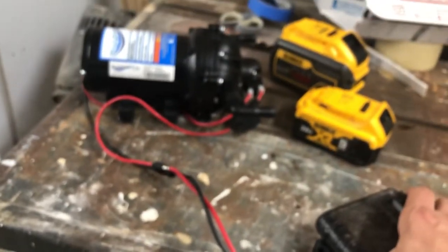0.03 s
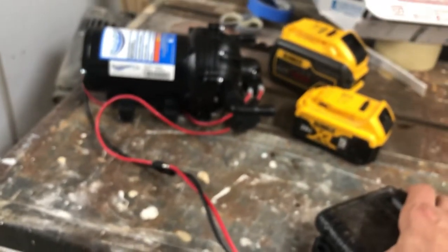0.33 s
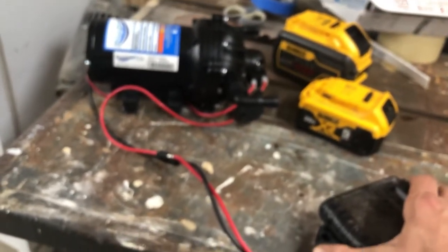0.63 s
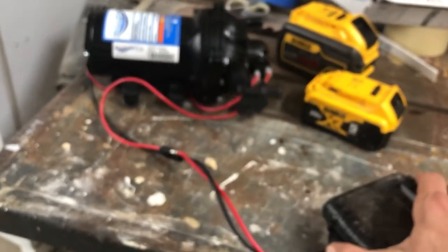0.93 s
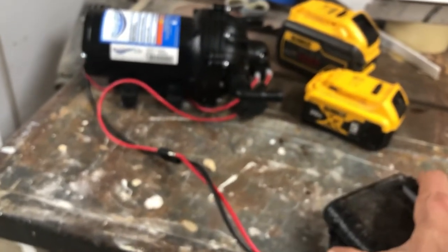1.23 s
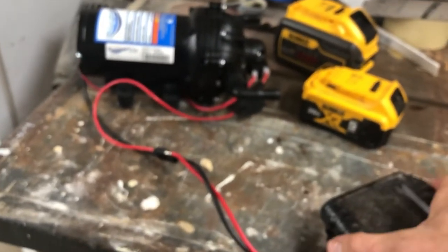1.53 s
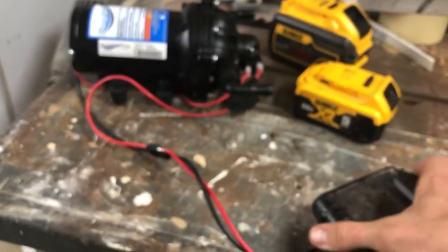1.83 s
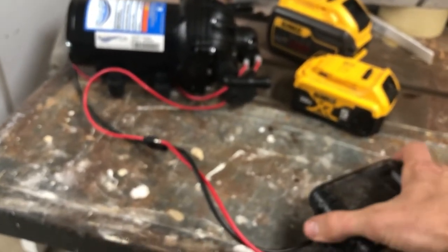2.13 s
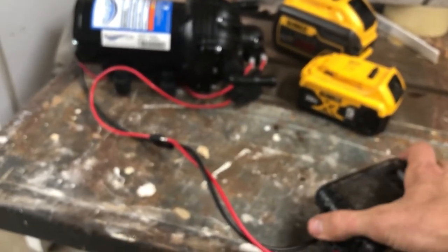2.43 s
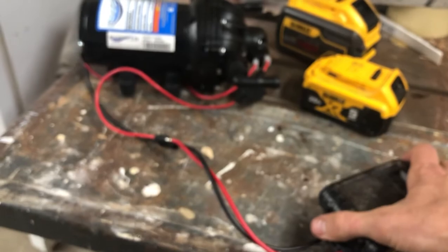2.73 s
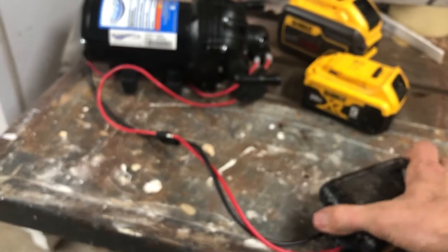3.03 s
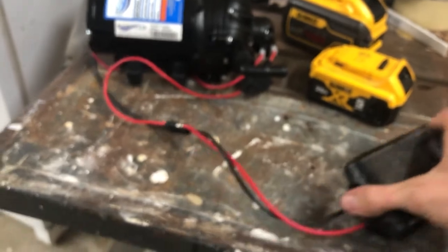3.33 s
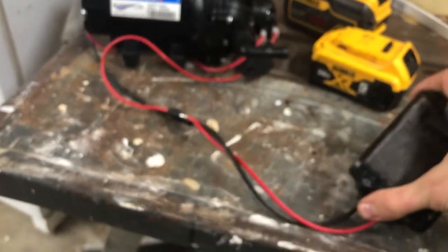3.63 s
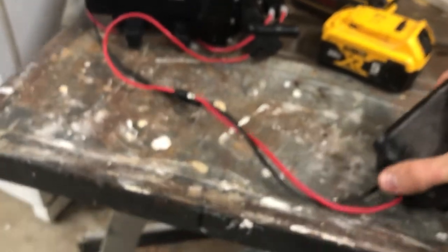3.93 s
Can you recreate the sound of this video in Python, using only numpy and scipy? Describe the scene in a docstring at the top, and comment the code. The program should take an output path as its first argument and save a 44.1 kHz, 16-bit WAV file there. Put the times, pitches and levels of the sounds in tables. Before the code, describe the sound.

An electric pump starts and runs close by on a workbench in a small workshop. After near silence, a short spark crackles at about 0.75 seconds and the motor kicks in with a loud, grinding jolt. From about 1 second to the end at 4 seconds, it runs steadily with a fast rattling buzz, a hum and a thin whine. Faint dull bumps on the bench come around 3.5 seconds.

```python
"""A small workshop, one microphone close to a wooden bench where an electric diaphragm pump runs dry.
The contact sparks at switch-on, the motor jolts and grinds up to speed under its inrush current, then
settles: every turn of the shaft knocks the pump head, slaps the valves and drags the brushes over the
commutator, above the hum of the body. The pump's feet shake the bench and now and then bump on it.
Behind it are a short room tail and faint room tone."""
import sys
import numpy as np
from scipy import signal
from scipy.fft import rfft, irfft, next_fast_len
from scipy.io import wavfile
from scipy.ndimage import map_coordinates

SR = 44100
rng = np.random.default_rng(int(sys.argv[2]) if len(sys.argv) > 2 else 0)


def to_wav(s):
    """Save 16-bit WAV."""
    ch = np.atleast_2d(s).T  # columns
    pcm = np.round(np.clip(ch, -1, 1) * 32767)  # PCM
    wavfile.write(sys.argv[1], SR, pcm.astype(np.int16))


N = 176400
T = np.arange(N) / SR
START_S, SPIN_UP_S = .785, .055  # the shaft starts to turn; time constant of its run-up
BALLS_PER_TURN = 2.075  # bearing balls that pass the loaded side

# shaft speed once run up (time [s], speed [turns/s])
SHAFT_SPEED = [(1.0, 57.1), (1.5, 57.42), (2.0, 57.6), (2.5, 57.78), (2.9, 57.87), (3.3, 57.85),
               (3.6, 57.7), (4.0, 57.72)]
# how loosely the pump rattles on its feet (time [s], gain [dB])
LOOSENESS = [(1.0, 3.5), (1.3, 1), (1.8, 1.3), (2.3, 0), (2.9, -1), (3.15, 1.3), (3.5, 1), (4.0, 2)]
# head knocks and valve slaps within one turn (position [turns], relative level [dB])
HEAD_KNOCKS = [(0.013, -3), (0.151, 2), (.6, -7)]
VALVE_SLAPS = [(.07, -1.5), (.32, -1.5), (.79, 1.5)]
# sharp ticks of the pump head (time [s], level [dB], pitch [Hz])
HEAD_TICKS = [(0.9149, -13, 3830), (1.1787, -26, 3740), (1.254, -16, 1270), (1.4595, -27, 5050),
              (1.806, -34, 5550), (3.841, -27.5, 3350)]
# steady partials of the body's hum (multiple of shaft speed, level [dB])
BODY_HUM = [(2, -38.5), (5, -35), (7, -48), (8, -43), (9, -49), (11, -40.5), (12, -43.5), (13, -46),
            (19, -46)]
# drifting hum at 1, 3, 4 and 6 times shaft speed (time [s], then four levels [dB])
LOW_HUM = [(1.0, -44, -43, -45, -44), (1.4, -45, -38.5, -44.5, -42), (1.65, -47, -36, -41.5, -39),
           (2.3, -46, -33.5, -38, -42.5), (2.95, -49, -33.5, -39.5, -42.5), (3.1, -45, -38.5, -41, -44.5),
           (3.3, -42, -46, -37, -47), (4.0, -44, -46, -40.5, -42.5)]
# commutator whine (time [s], level [dB])
WHINE = [(1.0, -43), (1.5, -42.5), (3.45, -43), (3.55, -45.5)]
# resonances of the motor can (frequency [Hz], width [Hz], relative level [dB])
CAN_MODES = [(3573, 150, 4.5), (4090, 81, 4), (5085, 78, 4.5), (5474, 51, 8), (6240, 110, 0.5),
             (7350, 64, 3.5), (7930, 125, 0), (11700, 270, -4.5), (12220, 150, -1.5), (14400, 390, -11)]
# resonances of the casing (frequency [Hz], relative level [dB], t60 [s])
CASING_MODES = [(193, 4.5, 0.15), (563.6, -5, 0.65), (650, 2.5, 0.14), (718, -3.5, 0.43), (795, -5, 0.22),
                (908, -4, 0.45)]
# contact sparks (time [s], relative level [dB], t60 [s])
SPARKS = [(0.684, -50, .04), (0.747, -39, 0.021), (0.752, -26.5, 0.018), (0.7627, -28, 0.016),
          (0.7673, -10, 0.013), (0.77, 3.5, 0.018), (0.7758, -4, 0.0099)]
# feet bumping the bench top (time [s], level [dB], half-length [s], pitch [Hz])
BENCH_BUMPS = [(0.807, -27, 0.018, 155), (0.938, -24.5, 0.02, 220), (0.99, -43, 0.07, 80.5),
               (1.037, -31.5, 0.041, 149), (3.463, -34.5, 0.045, 194), (3.6, -38, 0.023, 180),
               (3.856, -31.5, 0.022, 210)]
# tone colour of each source at the microphone (frequency [Hz], relative level [dB])
HEAD_SPECTRUM = [(40, -73), (170, -23), (400, -20.5), (530, -18), (640, -10.5), (760, 6.5), (920, 0),
                 (1050, -10), (1500, -12.5), (3000, -53)]
VALVE_SPECTRUM = [(400, -60.5), (900, -13), (1200, 0.5), (1500, 2), (1850, 2.5), (2150, -8), (2700, -16),
                  (4000, -12.5), (9000, -56)]
BRUSH_SPECTRUM = [(1180, -28.5), (2000, -5.5), (2330, -1), (2700, 0), (3020, -10), (3620, -4), (4800, -6.5),
                  (5420, -0.5), (6220, -4.5), (6890, -8.5), (7640, -1), (9080, -7), (10000, -5.5),
                  (11100, -16), (12000, -15), (13000, -18.5), (14800, -5.5), (15600, -12.5)]
GRIND_SPECTRUM = [(180, -54), (300, -11), (526, -29), (581, -3), (621, -7), (923, -11.5), (1040, -16.5),
                  (1400, -15), (2840, -14.5), (7790, -24.5), (15600, -40)]
SPARK_SPECTRUM = [(30, -43), (150, -32), (500, -4.5), (1500, -2), (2500, 1), (3300, 6), (4500, -7.5),
                  (5600, 1.5), (8000, -4.5), (11000, -8.5), (15500, -12)]
ROOM_TONE_SPECTRUM = [(20, -35), (64, -12), (122, -5), (199, -16), (240, -8.5), (282, -21), (400, -21),
                      (15600, -49)]
# the workshop's reverberation (frequency [Hz], t60 [s])
ROOM_DECAY = [(150, 0.28), (1500, 0.14), (6000, 0.23), (15000, 0.062)]


def pump_head(turns, loose):
    """The diaphragm drive knocks, in a slow beat with its bearing; valves slap, the bench shudders."""
    knocks = impacts(turns, HEAD_KNOCKS, jitter_s=.0001, scatter_db=1.9, creep_turns=.066)
    slaps = impacts(turns, VALVE_SLAPS, jitter_s=.00007, scatter_db=1.14)
    head = unit(coloured(unit(knocks) + .62 * chatter(knocks, t60_s=.049), HEAD_SPECTRUM))
    valves = unit(coloured(unit(slaps) + 1.07 * chatter(slaps, t60_s=.041), VALVE_SPECTRUM))
    shudder = amp(-45.5) * loose * rumble(hz=261) + amp(-42.5) * rumble(hz=683)
    return loose * (amp(-33.5) * head + shudder) + amp(-38.5) * valves


def head_ticks(t60_s=.02):
    """The pump head gives a few sharp, ringing ticks."""
    return sum(amp(db - 60 * age(s) / t60_s) * (T > s)
               * np.sin(2 * np.pi * hz * age(s) + .5 * wobble(1500)) for s, db, hz in HEAD_TICKS)


def hum(turns, loose, waver_db=1.32, slip_rad=.1):
    """Each turn heaves the body once, deepest bass first; the commutator whines at 32 cycles a turn."""
    def partial(k):
        if k < 7:  # the bass is steadier, each higher multiple lagging
            unsteady, lead_turns = .5, .414 - .0504 * k
        else:
            unsteady, lead_turns = 1 + k / 24, .11 * rng.standard_normal() / k - .1
        phase = 2 * np.pi * k * (turns + lead_turns) + unsteady * slip_rad * loose * wobble(25.16)
        waver = amp(min(unsteady, 1) * waver_db * loose * wobble(22.15))
        return -np.sqrt(2) * waver * np.cos(phase)
    times, *levels_db = np.transpose(LOW_HUM)
    lows = sum(amp(np.interp(T, times, db)) * partial(k) for k, db in zip((1, 3, 4, 6), levels_db))
    whine = amp(curve(WHINE)) * partial(32)
    body = sum(amp(db) * partial(round(k)) for k, db in BODY_HUM)
    return body + lows + whine


def brushes(turns, swell_db=.75, flutter_db=2, bed_in_db=1.5, bed_in_s=.73):
    """The brushes scrape over the same 32 worn bars each turn and ring the motor can."""
    wear = rng.standard_normal((32, 2))
    bars = [((k + .2 * shift) / len(wear), -.5 * depth) for k, (shift, depth) in enumerate(wear)]
    ticks = impacts(turns, bars, jitter_s=.000008, scatter_db=2.5)
    swell = amp(swell_db * np.cos(2 * np.pi * (turns - .6)))
    scrape = (unit(ticks) + chatter(ticks, t60_s=.011)) * swell
    hiss = unit(coloured(scrape, BRUSH_SPECTRUM))
    flutter = amp(flutter_db * np.tanh(wobble(70)))
    can = unit(ringing(scrape * flutter, CAN_MODES))
    settle = amp(bed_in_db * np.exp(-age(START_S) / bed_in_s))  # a little louder at first
    return settle * (amp(-41.5) * hiss + amp(-55) * can)


def end_play(turns, fade_db_per_s=2):
    """The armature's end play pings the motor can unevenly, twice a turn, calming as the motor runs."""
    ticks = impacts(turns, [(.59, 1.5), (.3, -3)], jitter_s=.0012, scatter_db=3.5)
    can = ringing(chatter(np.tanh(ticks / 2), t60_s=.016), CAN_MODES)
    return amp(-42.5 - fade_db_per_s * age(START_S)) * unit(can)


def inrush(turns, peak_s=.797, rise_s=.022, fall_db_per_s=70.5):
    """From the strongest spark on, inrush current makes the brushes grind, fading as speed builds."""
    contact_s = SPARKS[-2][0]
    rise = np.exp(np.minimum(T - peak_s, 0) / rise_s) * (T > contact_s)
    ripple_db = -2 * np.cos(2 * np.pi * 16 * turns)
    grind = noise() * amp(ripple_db + .99 * wobble(350))
    return rise * amp(-16.5 - fall_db_per_s * age(peak_s)) * unit(coloured(grind, GRIND_SPECTRUM))


def jolt(rise_s=.011, rough_rad=.46):
    """The starting torque kicks the casing, which rings out."""
    t = age(START_S)
    ring = sum(amp(db - 60 * t / t60) * np.sin(2 * np.pi * hz * t + rough_rad * wobble(90))
               for hz, db, t60 in CASING_MODES)
    return amp(-15) * (1 - np.exp(-t / rise_s)) * ring


def sparks(weak_below_db=-10, dull_hz=2000):
    """The contact sparks in bursts of noise as it closes; weak sparks lose their treble."""
    def crackle(rows):
        envelope = sum(amp(db - 60 * age(s) / t60) * (T >= s) for s, db, t60 in rows)
        return coloured(noise() * envelope, SPARK_SPECTRUM)
    weak = crackle([row for row in SPARKS if row[1] < weak_below_db])
    strong = crackle([row for row in SPARKS if row[1] >= weak_below_db])
    return strong + filtered(weak, lambda hz: 1 / (1 + 1j * hz / dull_hz))


def bench(shuffle_from_s=3.04):
    """The feet bump on the bench top, which booms dully; later they shuffle without pause."""
    booms = sum(amp(db) * np.exp(-.5 * ((T - s) / half_length) ** 2) * rumble(hz)
                for s, db, half_length, hz in BENCH_BUMPS)
    shuffle = amp(-46) * np.clip(10 * (T - shuffle_from_s), 0, 1) * rumble(hz=192)
    return booms + shuffle


def rumble(hz, width_octaves=.53):
    """Dull noise of the bench top round a pitch."""
    return unit(filtered(noise(), lambda f: np.exp(-.5 * (np.log2((f + 1) / hz) / width_octaves) ** 2)))


def workshop(x):
    """The room's short tail reaches the microphone 4 ms late, its highest treble dying first."""
    hz, t, spectra = signal.stft(rng.standard_normal(SR // 2), SR, nperseg=256)
    decay = amp(-60 * t / along(ROOM_DECAY, hz)[:, None])
    tail = signal.istft(spectra * decay, SR, nperseg=256)[1]
    return signal.fftconvolve(x, np.pad(tail, (SR // 250, 0)) / np.linalg.norm(tail))[:N]


def room_tone():
    """The faint, low noise of the workshop itself."""
    return amp(-63.5) * unit(coloured(noise(), ROOM_TONE_SPECTRUM))


def impacts(turns, pattern, jitter_s, scatter_db, creep_turns=0):
    """Pulses at (position [turns], level [dB]) in each turn, uneven in time and strength."""
    pulses = np.zeros(N)
    for position, db in pattern:
        timing, strength = rng.standard_normal((260, 2)).T
        due = np.arange(len(timing)) + 1 + position
        # the pulse creeps earlier as the bearing's balls roll round, then drops back
        due = due - creep_turns * (due * BALLS_PER_TURN % 1 - .5)
        times = np.interp(due, turns, T, right=np.inf) + jitter_s * timing
        heard = times < T[-1]
        pulses += np.bincount((times[heard] * SR).astype(int), amp(db + scatter_db * strength[heard]), N)
    return pulses


def chatter(pulses, t60_s):
    """A short burst of noise after each pulse."""
    decay = amp(-60 * T[:SR // 20] / t60_s)
    return unit(signal.fftconvolve(pulses, decay)[:N] * noise())


def ringing(x, modes):
    """x through resonances of alternating sign (frequency [Hz], width [Hz], level [dB])."""
    return filtered(x, lambda f: sum((-1) ** k * amp(db) * 1j * f * width
                                     / (hz * hz - f * f + 1j * f * width)
                                     for k, (hz, width, db) in enumerate(modes)))


def coloured(x, spectrum):
    """x through a causal filter shaped by (frequency [Hz], level [dB]) points."""
    def response(hz):
        cepstrum = irfft(np.log(amp(along(spectrum, hz))))
        half = len(cepstrum) // 2
        cepstrum[1:half] *= 2  # folded forward for minimum phase
        cepstrum[half + 1:] = 0
        return np.exp(rfft(cepstrum))
    return filtered(x, response)


def filtered(x, response):
    """x through a complex frequency response."""
    size = 2 * next_fast_len(N * 2 // 3)
    return irfft(rfft(x, size) * response(np.fft.rfftfreq(size, 1 / SR)), size)[:N]


def along(points, hz):
    """(frequency [Hz], value) points read off a log axis."""
    frequencies, values = np.transpose(points)
    return np.interp(np.log(hz + 1), np.log(frequencies + 1), values)


def curve(points):
    """(time [s], value) points as one value per sample."""
    return np.interp(T, *np.transpose(points))


def wobble(rate):
    """A smooth random curve, rate knots a second."""
    return map_coordinates(rng.standard_normal(4000), [T * rate + 2], mode="wrap")


def noise():
    """Fresh white noise."""
    return rng.standard_normal(N)


def age(start_s):
    """Seconds since start_s, zero before it."""
    return np.maximum(T - start_s, 0)


def amp(db):
    """Decibels to gain."""
    return 10 ** (np.asarray(db) / 20)


def unit(x):
    """Scale to rms 1."""
    return x / np.sqrt(np.mean(x ** 2) + 1e-20)


def scene():
    """Close to the bench: one shaft drives the running sounds; the hum sets in only near full speed."""
    run_up = 1 - np.exp(-age(START_S) / SPIN_UP_S)
    turns = np.cumsum(run_up * curve(SHAFT_SPEED)) / SR
    loose = amp(curve(LOOSENESS))
    running = run_up * (pump_head(turns, loose) + brushes(turns) + end_play(turns))
    clatter = running + inrush(turns) + jolt() + head_ticks() + sparks() + bench()
    room = room_tone() + amp(-11) * workshop(clatter)
    return (clatter + run_up ** 7 * hum(turns, loose) + room)[None]


def record(dry, ceiling=.8, low_cut_hz=32, top_hz=15850):
    """The microphone rounds off the loudest peaks and drops the deepest bass and the highest treble."""
    def band(hz):
        low_cut = hz ** 4 / (hz ** 4 + low_cut_hz ** 4)
        high_cut = np.clip((top_hz - hz) / 300 + .5, 0, 1) ** 2
        return low_cut * high_cut
    rounded = dry[0] / (1 + (dry[0] / ceiling) ** 4) ** .25
    return filtered(rounded, band)[None]


dry = scene()
out = record(dry)
to_wav(out)
```